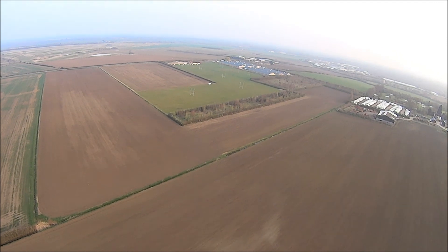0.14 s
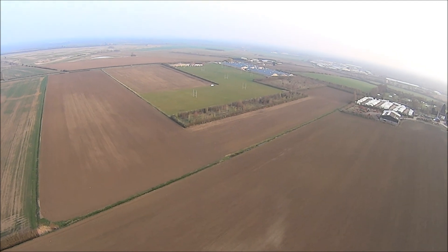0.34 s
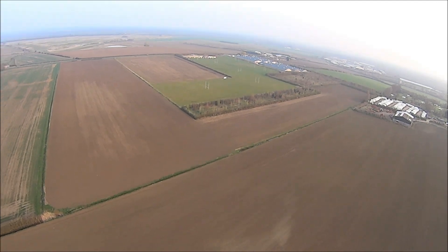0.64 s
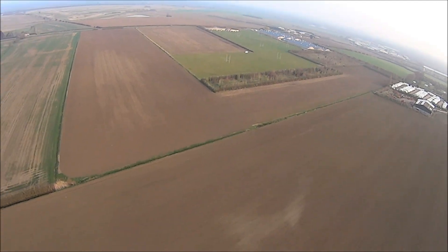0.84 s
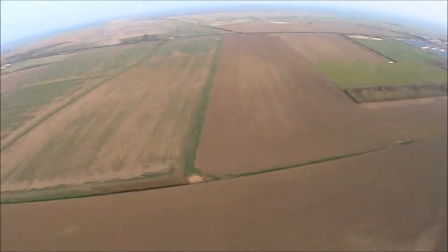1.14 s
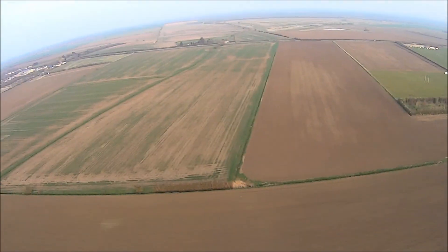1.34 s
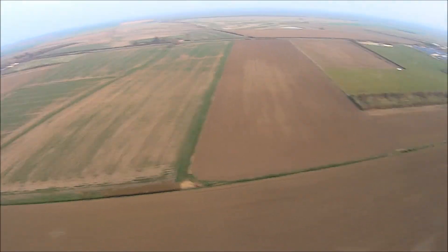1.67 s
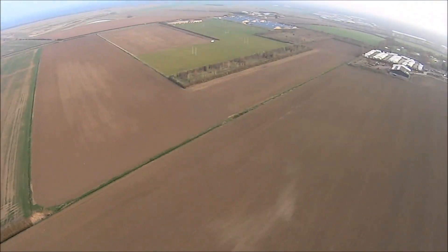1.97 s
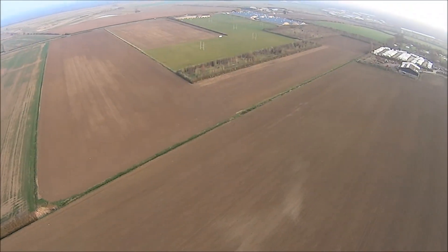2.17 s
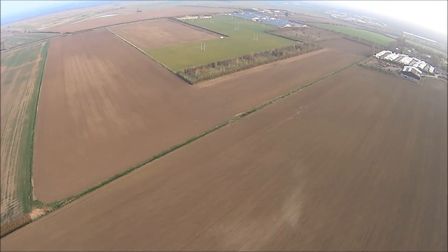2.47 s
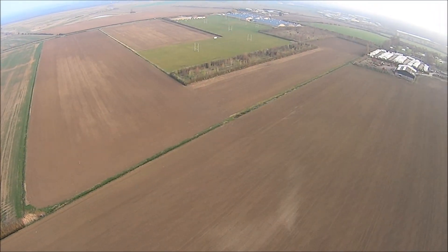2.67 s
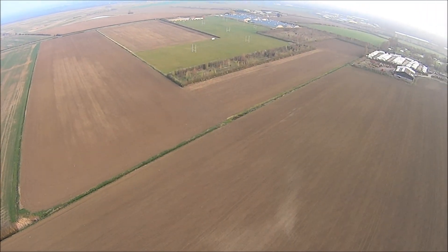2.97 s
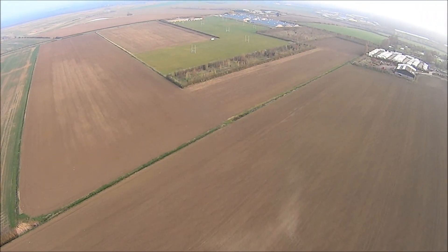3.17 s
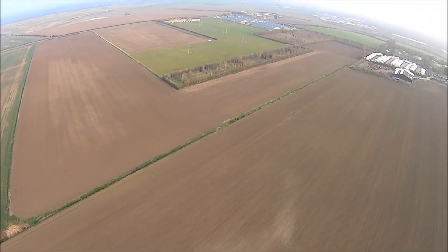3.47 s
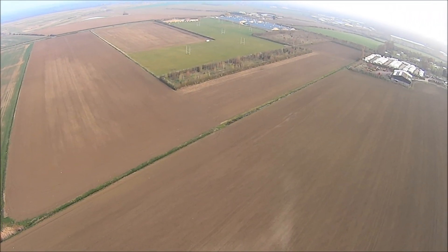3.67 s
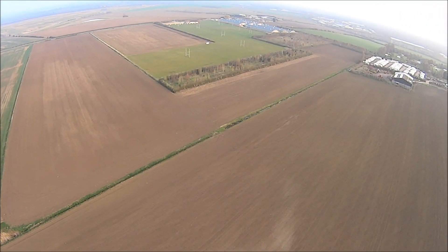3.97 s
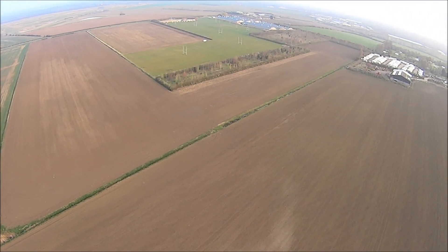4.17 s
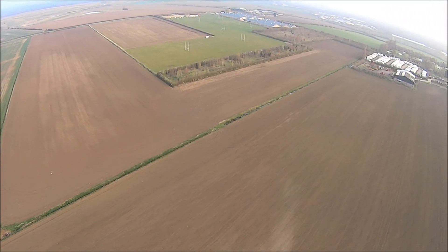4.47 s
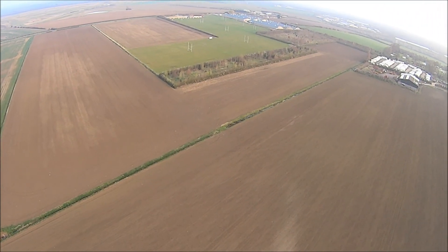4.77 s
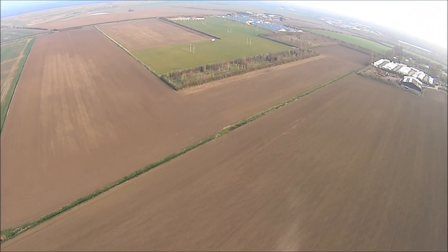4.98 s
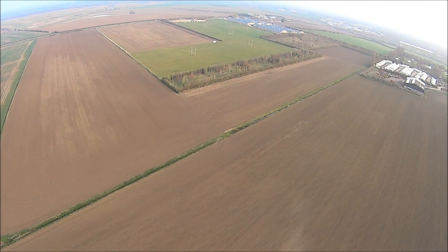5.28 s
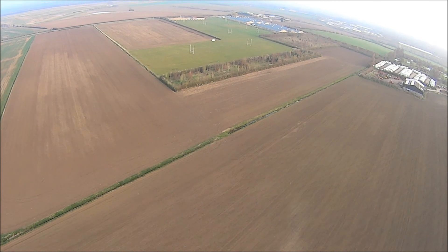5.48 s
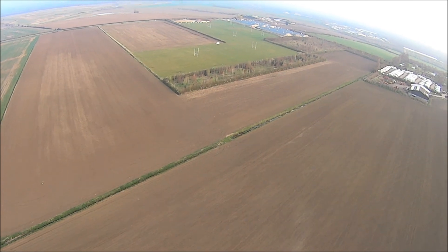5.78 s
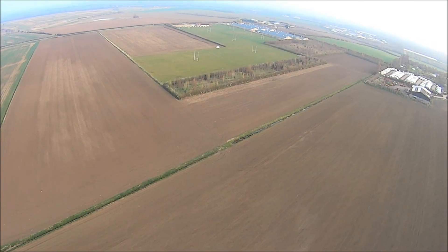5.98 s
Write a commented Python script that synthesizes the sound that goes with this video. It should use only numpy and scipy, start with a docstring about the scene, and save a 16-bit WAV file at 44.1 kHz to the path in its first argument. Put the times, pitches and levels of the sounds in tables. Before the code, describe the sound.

Loud steady paramotor drone and roaring air over farmland, with a brief choppier, moaning wind gust between one and two seconds as the head turns.

```python
"""A paramotor in cruise, heard at two ports of a closed housing on the pilot's helmet.
First, air roar (noise through the housing's resonances, chopped by the two-blade propeller) covers the
hum of propeller and geared single-cylinder engine (sines), faint bright ticks and a low rumble (noise).
From about 1 to 2 s the head turns aside: wind moans across the ports (wavering tone and noise) and the
blade passes stand out. After about 3 s the revs sag, and the hum sinks with them."""
import sys
import numpy as np
from scipy.fft import rfft, irfft, next_fast_len
from scipy.io import wavfile
from scipy.ndimage import uniform_filter1d, map_coordinates

SR = 44100
rng = np.random.default_rng(int(sys.argv[2]) if len(sys.argv) > 2 else 0)


def unload_wav(signal):
    """Save mono or channel-first audio to the path in sys.argv[1] as 16-bit WAV at rate SR, clipped to [-1, 1]."""
    wavfile.write(
        sys.argv[1],
        SR,
        np.round(np.clip(np.atleast_2d(signal).T, -1, 1) * 32767).astype(np.int16),
    )


N = 269892

# Propeller speed over time: time_s, speed_turns_per_s
PROPELLER_SPEED = [(0.0, 21.525), (0.68, 21.615), (1.02, 21.706), (1.36, 21.589), (1.7, 21.649),
                   (2.04, 21.623), (2.38, 21.775), (2.72, 21.564), (3.06, 21.569), (3.4, 21.393),
                   (3.74, 21.042), (4.08, 20.882), (4.42, 20.898), (5.1, 20.745), (5.78, 20.565),
                   (6.12, 20.7)]
GEAR = 2.7  # engine turns per propeller turn
# Steady hum of the propeller: multiple_of_propeller_speed, left_db, right_db, left_lead_rad
PROPELLER_TONES = [(1, -54.1, -52.4, -0.1), (2, -52.5, -52.1, -0.1), (4, -40.5, -38.8, 0.0),
                   (6, -47.0, -52.0, 0.1), (8, -44.7, -48.1, 0.1), (10, -47.6, -45.3, 0.3),
                   (12, -55.8, -46.8, -0.3), (16, -37.9, -42.2, -1.0), (18, -43.4, -43.3, 0.6),
                   (20, -47.3, -47.4, 0.5), (22, -42.2, -42.2, -0.5), (24, -36.9, -44.6, -1.4),
                   (26, -32.1, -31.1, -0.7), (28, -35.0, -31.0, -0.6), (30, -44.6, -40.5, -0.6),
                   (32, -43.2, -34.3, -1.3), (34, -50.0, -38.6, 1.3), (36, -49.8, -44.7, 1.0),
                   (38, -50.3, -42.8, 1.4), (42, -51.2, -47.3, 1.3), (48, -48.7, -43.9, 1.5),
                   (54, -42.6, -44.3, 1.0), (56, -43.9, -44.4, 1.8), (60, -44.5, -42.8, 2.3),
                   (70, -44.6, -38.4, -0.7)]
# Steady hum of the engine, head straight: multiple_of_engine_speed, left_db, right_db, left_lead_rad
MOTOR_TONES = [(1, -48.1, -46.7, -0.1), (3, -47.4, -50.0, 0.2), (4, -53.9, -51.6, 0.3),
               (14, -49.5, -40.8, 0.6), (16, -49.1, -46.8, 0.9), (17, -48.3, -48.5, 1.0),
               (20, -42.6, -44.3, 1.0), (26, -39.5, -37.9, -0.4), (27, -36.5, -37.5, -0.1),
               (28, -30.6, -33.2, -0.3), (29, -32.5, -35.3, -0.4), (30, -32.3, -32.9, -0.2),
               (31, -40.7, -39.0, -0.3), (56, -57.9, -49.2, 2.2)]
ENGINE_TURNED_DB = 2.5  # the engine is heard more directly with the head turned
# Resonances of the housing:
# centre_hz, width_hz, left_db, right_db, left_right_likeness (0 to 1), left_lead_rad
HOUSING_RESONANCES = [(131, 144, -11.7, -9.5, 0.93, 0.1), (189, 203, -23.3, -27.0, 1.0, 1.7),
                      (329, 94, -4.4, -9.9, 0.21, -1.9), (385, 428, -13.7, -14.2, 0.68, 0.6),
                      (574, 92, -0.6, 0.7, 0.87, -0.7), (670, 119, -14.2, -2.7, 1.0, -1.2),
                      (769, 214, -16.0, -7.4, 0.8, 1.4), (979, 172, -9.7, -8.0, 0.72, 1.2),
                      (1161, 305, -7.1, -8.3, 0.8, 1.4), (1312, 183, -7.2, -6.1, 1.0, 2.9),
                      (1518, 88, -3.7, 0.7, 0.91, -0.6), (1580, 115, 0.3, -0.4, 0.96, -0.3),
                      (1716, 179, 2.4, -0.7, 0.94, -0.1), (1915, 422, -11.5, -16.1, 0.53, -0.3),
                      (2269, 559, -12.5, -17.9, 0.44, 0.2), (2671, 500, -16.1, -23.4, 0.76, -2.9),
                      (3030, 247, -14.1, -12.4, 1.0, 3.2), (3062, 601, -16.9, -18.9, 0.99, 0.6),
                      (3393, 635, -19.0, -15.8, 0.78, -2.9), (4250, 744, -20.3, -21.8, 0.85, 2.8),
                      (4996, 128, -28.4, -19.6, 0.93, 0.4), (5204, 1000, -24.0, -19.9, 1.0, 0.0),
                      (5590, 1082, -30.0, -29.0, 1.0, -2.6), (6146, 365, -29.4, -28.7, 1.0, -0.7),
                      (6875, 632, -35.3, -28.9, 0.29, -1.5), (7411, 1279, -28.9, -29.6, 0.44, -0.5),
                      (8513, 784, -37.3, -35.4, 0.09, 0.0), (9311, 670, -34.6, -47.6, 0.44, -1.5),
                      (9878, 1194, -46.5, -46.5, 0.49, 1.6), (10359, 367, -44.4, -47.2, 0.74, 0.3)]
# How the roar throbs at each pitch; in between, values are interpolated:
# centre_hz, blade_depth_db, blade_lag_turns, strut_depth_db, strut_lag_turns, firing_depth_db,
# random_waver_db (before its two shares), head_turned_blade_depth_db, head_turned_level_change_db
ROAR_THROB = [(300, 2, 0.083, 2.5, -0.034, 0, 0.5, 7, 0), (603, 3, 0.031, 3, -0.055, 1.7, 0.3, 7, -2),
              (1700, 0.5, 0.019, 2, 0.0046, 0, 0.94, 1, -0.5), (2380, 2, -0.052, 1.5, -.05, 2.5, 2, 4, 1),
              (3150, 0.5, -0.079, 1, -0.036, 0.5, 1.66, -1, 2.5),
              (3530, -2, 0.028, 2, -.05, 3, 5.5, 1, -2.5),
              (4100, 2, 0.089, -0.5, -0.042, 1.5, 1.6, -2, -0.5),
              (5140, 1.2, 0.28, 1.4, -0.06, 0.8, 1.5, 3, -0.2),
              (6100, 0.5, .28, -2, -.05, 3.5, 1.5, 7, -3.5), (7450, 2.8, 0.12, 1.5, 0.1, 1, 2, 6, 2.5),
              (9500, 3, -0.083, 0, .07, 0.5, 2.5, -1.5, 0.5)]
ROAR_DB, ROAR_DRIFT_DB = -0.14, 0.06  # level of the roar entering the housing, and its slow random drift
# Level added to the roar's resonances from 1800 Hz up: time_s, level_db
ROAR_TREBLE = [(0, 0.1), (2.6, .2), (3.5, -1), (3.9, 0), (4.4, 0.66), (6.12, 0.45)]
# Level added to the roar near 330 Hz and 5 kHz, fuller at first: time_s, level_db
ROAR_FULLNESS = [(0, 2), (.8, 1.5), (1.3, 0), (1.9, -1), (2.2, .5), (3.6, -.5), (6.12, 0)]
# How far the head is turned aside: time_s, share (0 to 1)
HEAD_TURN = [(0, 0.02), (.9, 0), (1.2, 0.75), (1.7, 0.98), (1.95, 0), (2.15, 0.04), (6.12, 0)]
# Puffs of wind across the ports: start_s, hold_s, level_db (before the moan's own mix), pitch_hz (at start)
WIND_PUFFS = [(1.183, 0.008, -23, 177.6), (1.241, .14, -25, 210), (1.45, 0.055, -31, 174.7),
              (1.545, .015, -22.5, 159.2), (1.603, 0.0043, -32, 169.4), (1.66, .025, -24, 153.2),
              (1.757, .02, -22.5, 180), (1.85, 0.045, -27.5, 199)]
# Every puff swells, holds while its pitch sags, and drops.
RISE_DB_PER_S, FALL_DB_PER_S, SAG_HZ_PER_S = 330, 422, 187
# Low rumble of the airflow: centre_hz, width_hz, level_db (each as a single value)
AIR_RUMBLE = (33, 40, -52)
TOP_HZ = 10950  # nothing passes from here up


def roar(turns, head):
    """Each housing resonance is shaken by its own turbulence, chopped by blades, cage struts and firings."""
    length = next_fast_len(N + 8192)
    f = np.fft.rfftfreq(length, 1 / SR)
    total = 0
    main_db = ROAR_DB + ROAR_DRIFT_DB * wobble(2.6)
    treble_db = main_db + curves(ROAR_TREBLE)[0]
    low_db = main_db - 0.5  # the lowest resonances take a little less turbulence
    fuller_db = curves(ROAR_FULLNESS)[0]
    gust = flutter(30)  # felt by the whole housing at once

    engine_turns = GEAR * turns
    firing = np.cos(2 * np.pi * (engine_turns + 0.25)) + 0.5 * np.cos(4 * np.pi * engine_turns)
    turned_blades = np.cos(4 * np.pi * (turns - 0.08))  # two passes a turn, as the turned head hears them
    at_hz, *throb_columns = np.transpose(ROAR_THROB)

    for hz, width_hz, left_db, right_db, alike, lead in HOUSING_RESONANCES:
        throb_here = [np.interp(hz, at_hz, column) for column in throb_columns]
        (blade_db, blade_lag, strut_db, strut_lag,
         fire_db, waver_db, turned_db, shift_db) = throb_here

        straight_throb = blade_db * np.cos(4 * np.pi * (turns - blade_lag))
        throb_db = (1 - head) * straight_throb + head * turned_db * turned_blades
        throb_db += fire_db * firing
        # Four strut passes a turn, sharpened by their octave, half as deep with the head fully turned.
        struts = 8 * np.pi * (turns - strut_lag)
        throb_db += (1 - 0.5 * head) * strut_db * (np.cos(struts) + 0.29 * np.cos(2 * struts))
        throb_db += waver_db * (0.23 * gust + 0.69 * flutter(34))

        if hz < 850:
            band_db = low_db
        elif hz < 1800:
            band_db = main_db
        else:
            band_db = treble_db
        level_db = head * shift_db + band_db
        if 300 < hz < 350 or 4900 < hz < 5300:
            level_db = level_db + fuller_db

        turbulence = rng.standard_normal((2, N)) * unit(amp(throb_db)) * amp(level_db)
        shared, own = rfft(turbulence, length)
        # The right port hears part of the left port's noise, later in phase, and some of its own.
        right = alike * np.exp(-1j * lead) * shared + np.sqrt(1 - alike ** 2) * own
        total = total + resonance(hz, width_hz, f) * [amp(left_db) * shared, amp(right_db) * right]
    return irfft(total, length)[:, :N]


def propeller(turns):
    """The turning propeller hums at multiples of its own speed."""
    return tones(PROPELLER_TONES, turns, waver_db=1.75, drift=0.23)


def engine(turns, head):
    """The engine hums at multiples of its geared-up speed, louder with the head turned."""
    hum = tones(MOTOR_TONES, GEAR * turns, waver_db=4.0, drift=0.17)
    return amp(ENGINE_TURNED_DB * head) * hum


def tones(orders, turns, waver_db, drift):
    """Sines follow the shaft, wander in level and phase, and swell or sink along the housing's resonances."""
    out = np.zeros((2, N))
    step = 1024  # samples between looks at the housing's gain
    speed = np.gradient(turns)[::step] * SR
    for order, left_db, right_db, lead in orders:
        loose = min(order / 8, 1)  # higher multiples wander more in phase
        phase = 2 * np.pi * (order * turns + rng.random()) + drift * loose * wobble(4)
        level = np.sqrt(2) * unit(amp(waver_db * (loose - 0.34) * wobble(4.0)))
        passed = []
        for gain in housing_gain(order * speed):
            passed.append(np.interp(np.arange(N), np.arange(len(gain)) * step, unit(gain)))
        sines = np.sin([phase + lead / 2, phase - lead / 2])
        out += level * np.array(passed) * amp([[left_db], [right_db]]) * sines
    return out


def housing_gain(f):
    """The resonances' powers add up to how strongly the housing passes a tone to each port."""
    power = 0
    for hz, width_hz, left_db, right_db, _, _ in HOUSING_RESONANCES:
        power = power + np.abs(resonance(hz, width_hz, f) * amp([[left_db], [right_db]])) ** 2
    return np.sqrt(power)


def moan():
    """Wind across the ports makes a wavering edge tone with lumpy low noise around it."""
    t = np.arange(N) / SR
    start, hold, puff_db, pitch = np.transpose(WIND_PUFFS)
    puff_levels = []
    for s, h, db in zip(start, hold, puff_db):
        before_s, after_s = np.maximum(s - t, 0), np.maximum(t - s - h, 0)
        puff_levels.append(db - RISE_DB_PER_S * before_s - FALL_DB_PER_S * after_s)
    level_db = np.max(puff_levels, axis=0)  # the loudest puff rules

    # The pitch runs through the start and end of each hold in turn.
    pitch_times = np.ravel([start, start + hold], order="F")
    pitch_points = np.ravel([pitch, pitch - SAG_HZ_PER_S * hold], order="F")
    hz = np.interp(t, pitch_times, pitch_points)
    wavering_hz = hz * (1 + 0.059 * wobble(35))
    tone = np.sqrt(2) * np.sin(2 * np.pi * np.cumsum(wavering_hz) / SR)
    tone = tone * amp([[-0.5], [0.5]])  # a touch louder on the right

    lumps = filtered(rng.standard_normal((2, N)), lambda f: resonance(191, 190, f))
    lumps = unit(lumps + 0.39 * lumps[::-1])  # each port hears some of the other's noise
    return amp(level_db) * (amp(-2.5) * tone + amp(-2.5) * lumps)


def ticks(turns, head):
    """Each blade pass gives a short bright swish, one blade stronger; louder with the head turned."""
    passes = 2 * (turns + 0.2)
    random_db = rng.normal(0, 4, size=int(passes[-1]) + 4)
    strength_db = random_db[passes.astype(int)] - 7 * (passes % 2 >= 1)
    from_peak = passes % 1 - 0.5  # in blade passes; swells toward the peak, then stops quickly
    shape_db = np.where(from_peak < 0, 70 * from_peak, -130 * from_peak)
    burst = amp(strength_db + shape_db)
    bright = filtered(burst * rng.standard_normal((2, N)), lambda f: resonance(7400, 1300, f))
    return amp(-63 + 10 * head) * unit(bright)


def rumble():
    """Slow pressure swirls in the airflow are low noise, mostly alike at both ports."""
    hz, width_hz, db = AIR_RUMBLE
    swirl = filtered(rng.standard_normal((2, N)), lambda f: resonance(hz, width_hz, f))
    return amp(db) * unit(swirl + 0.6 * swirl[::-1])


def resonance(hz, width_hz, f):
    """A resonance passes sound near its centre; it is applied twice, for steep flanks."""
    return (1j * f * width_hz / (hz * hz - f * f + 1j * f * width_hz)) ** 2


def filtered(x, response):
    """Shape the spectrum of x by a response that depends on frequency."""
    length = next_fast_len(N + 8192)
    spectrum = rfft(x, length) * response(np.fft.rfftfreq(length, 1 / SR))
    return irfft(spectrum, length)[..., :N]


def wobble(rate):
    """A smooth random curve bends through rate random points a second."""
    step = 32  # drawn coarsely, then joined by straight lines
    points = rng.standard_normal(int(N * rate / SR) + 4)
    coarse = map_coordinates(points, [np.arange(0, N + step, step) * rate / SR])
    return np.interp(np.arange(N), np.arange(len(coarse)) * step, coarse)


def flutter(rate):
    """A quick random curve has its slow drift taken out."""
    curve = wobble(rate)
    return unit(curve - uniform_filter1d(curve, size=SR // 5))


def curves(rows):
    """Give one value per sample for each column after the time."""
    times, *columns = np.transpose(rows)
    return [np.interp(np.arange(N) / SR, times, column) for column in columns]


def amp(db):
    """Turn decibels into a plain multiplier."""
    return 10 ** (np.asarray(db) / 20)


def unit(x):
    """Scale x to an overall RMS of one."""
    return x / np.sqrt(np.mean(x ** 2) + 1e-20)


def scene():
    """Add up all the sources, driven by the same propeller and the same turn of the head."""
    turns = np.cumsum(curves(PROPELLER_SPEED)[0]) / SR
    head = np.clip(curves(HEAD_TURN)[0], 0, 1)
    machine = propeller(turns) + engine(turns, head)
    return roar(turns, head) + machine + moan() + ticks(turns, head) + rumble()


def record(dry):
    """Gain control leans on loud moments, peaks round off, and nothing passes above the band limit."""
    power = np.abs(uniform_filter1d(np.mean(dry ** 2, axis=0), size=1800))
    steadied = dry * ((power + 1e-6) / np.mean(power)) ** -0.12
    rounded = steadied / (1 + np.abs(steadied / 1.1) ** 4) ** (1 / 4)
    return filtered(rounded, lambda hz: hz < TOP_HZ)


dry = scene()
out = record(dry)
unload_wav(out)
```